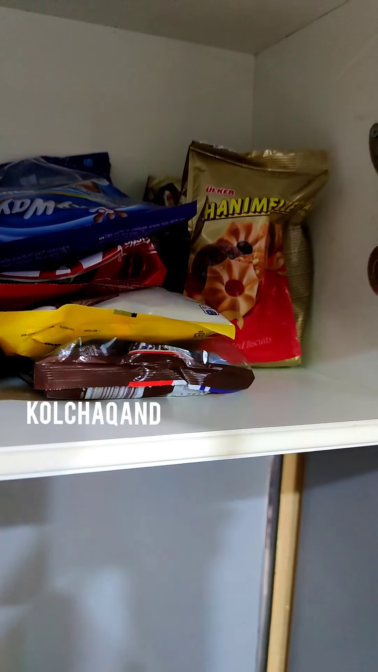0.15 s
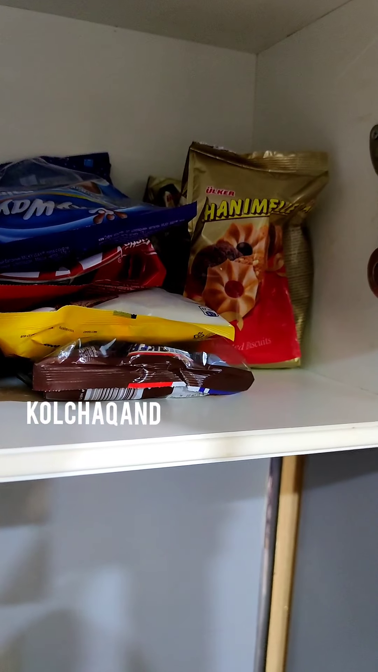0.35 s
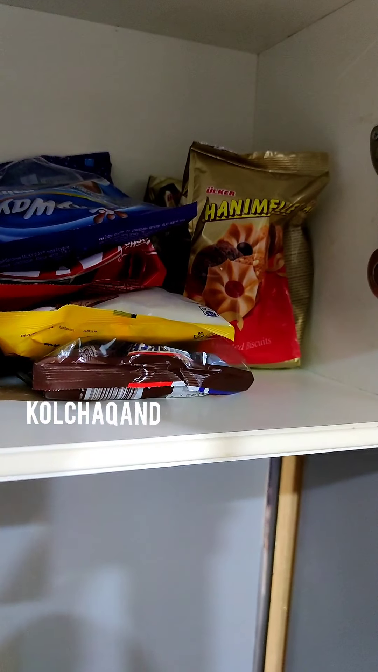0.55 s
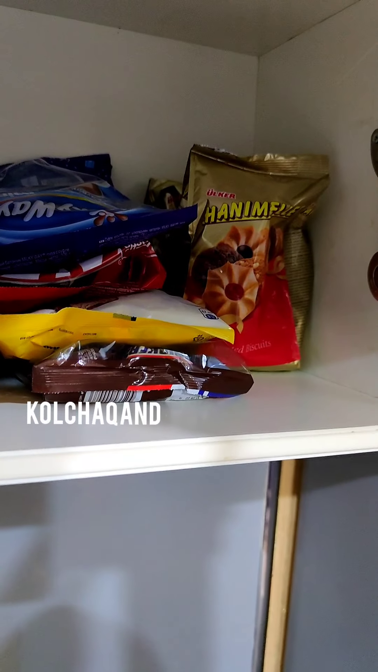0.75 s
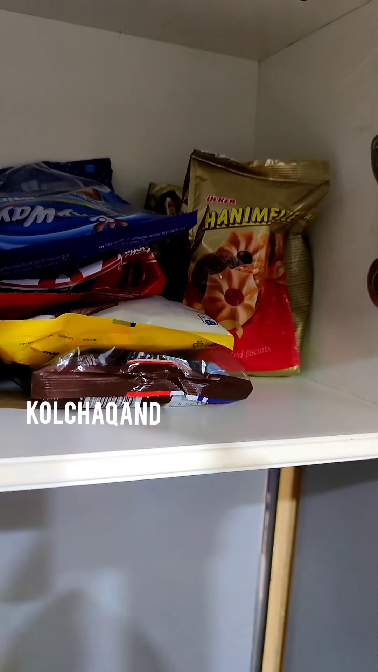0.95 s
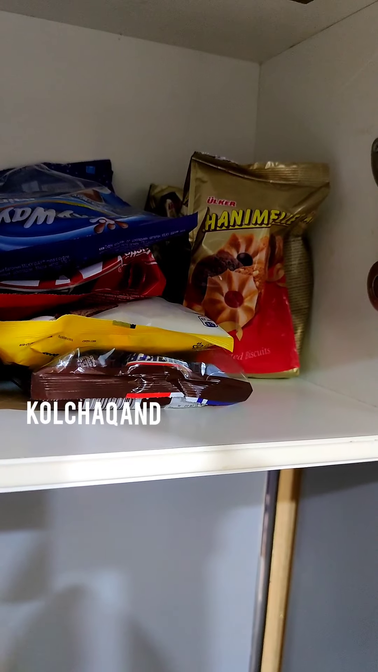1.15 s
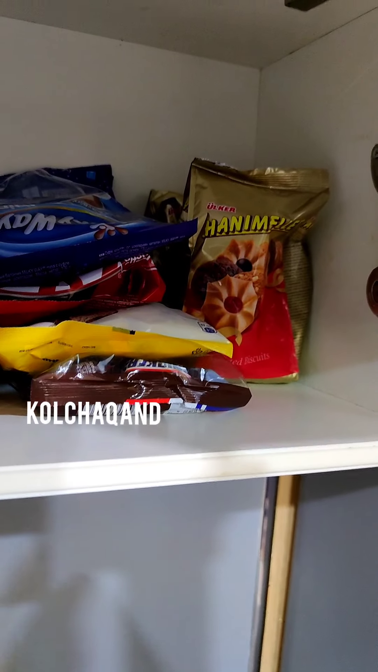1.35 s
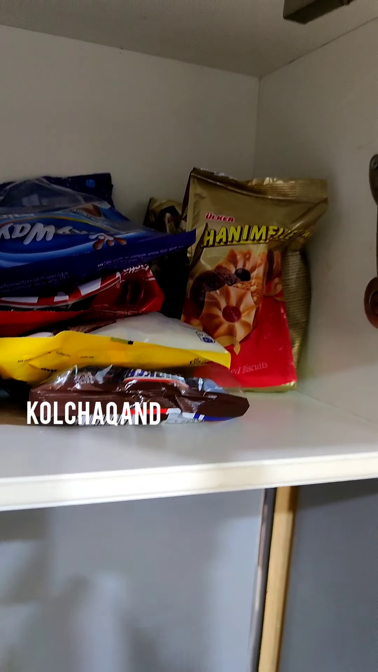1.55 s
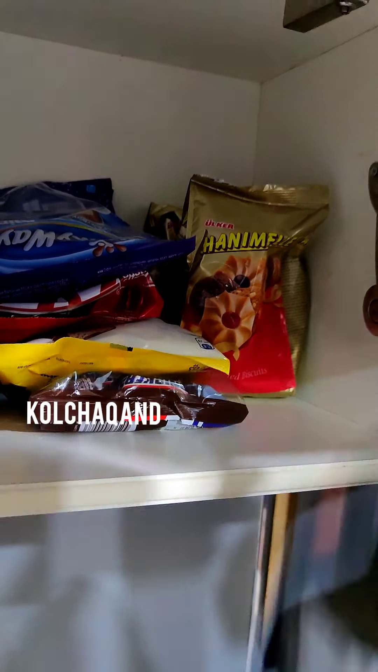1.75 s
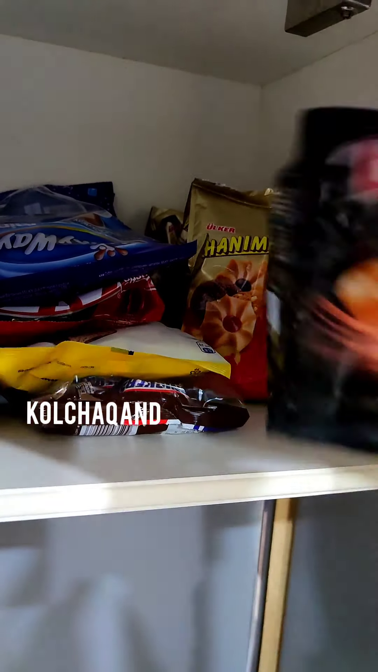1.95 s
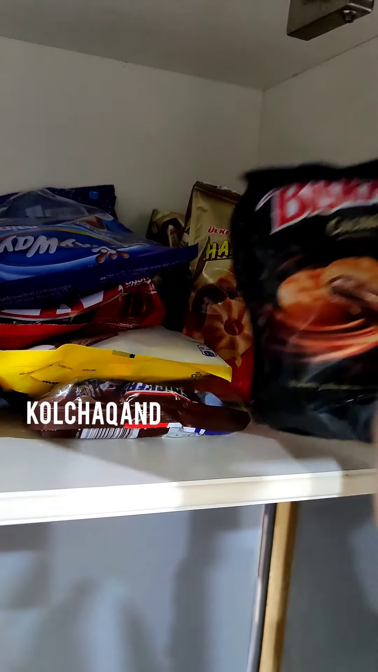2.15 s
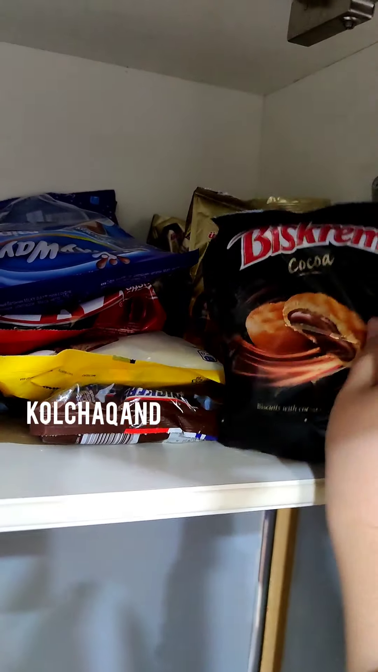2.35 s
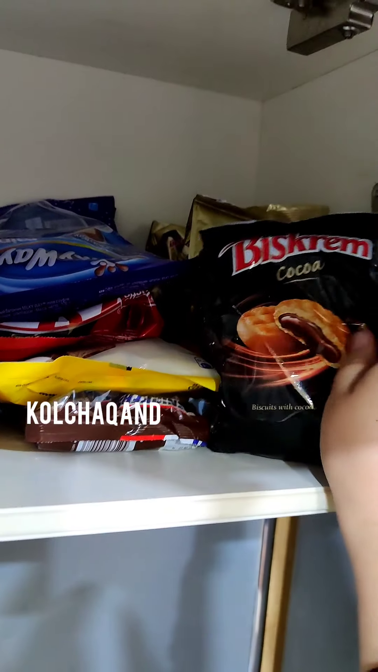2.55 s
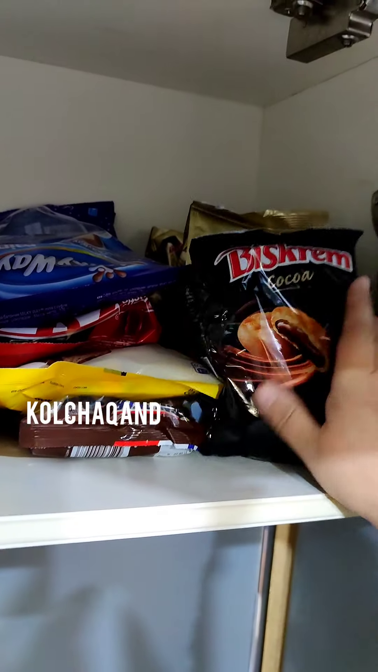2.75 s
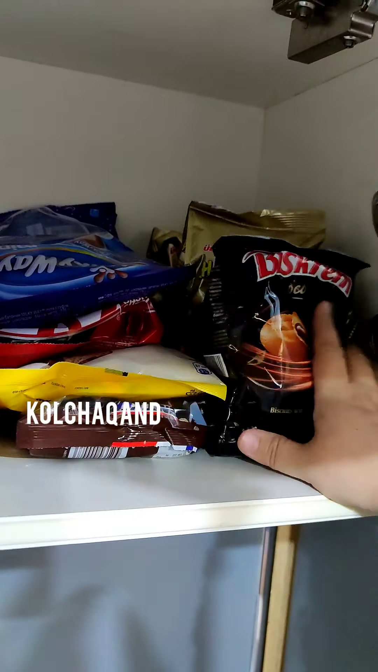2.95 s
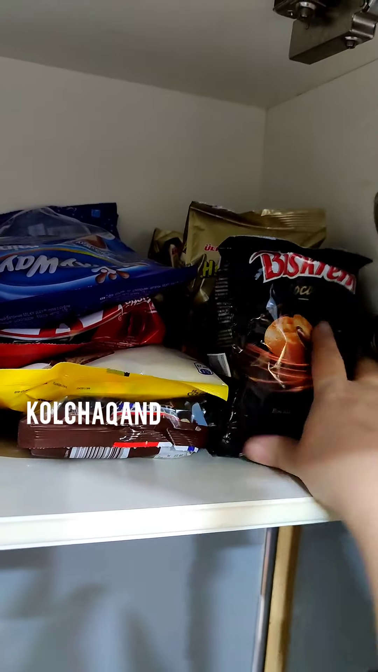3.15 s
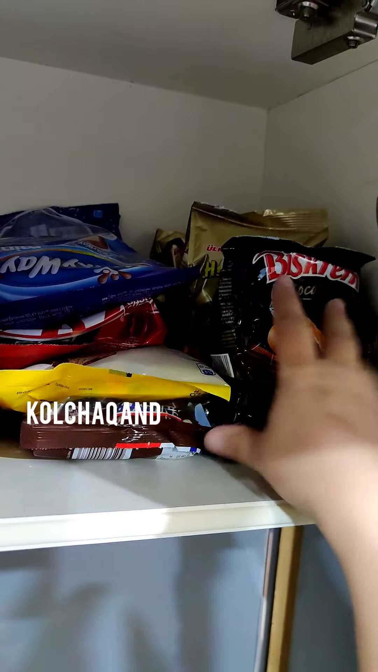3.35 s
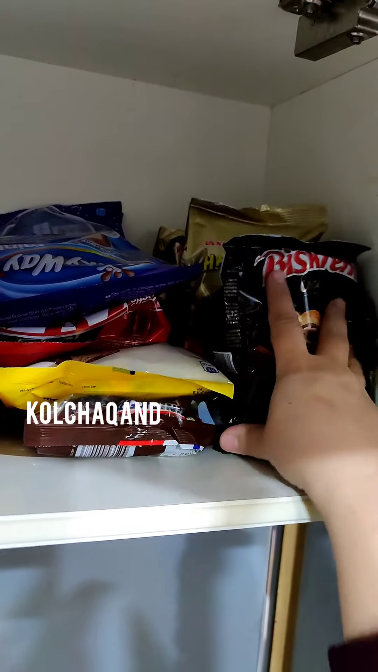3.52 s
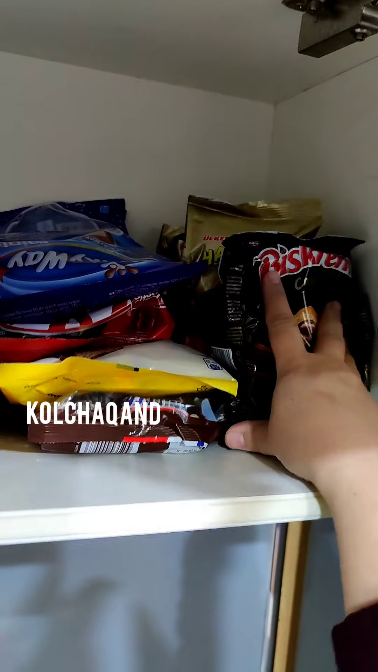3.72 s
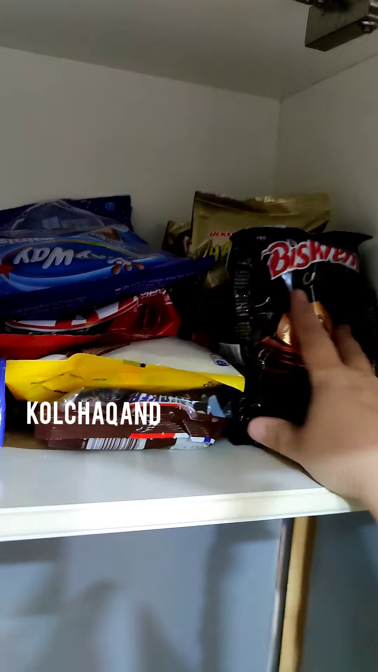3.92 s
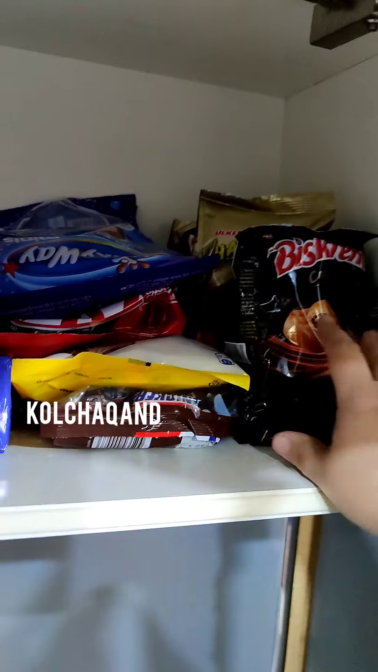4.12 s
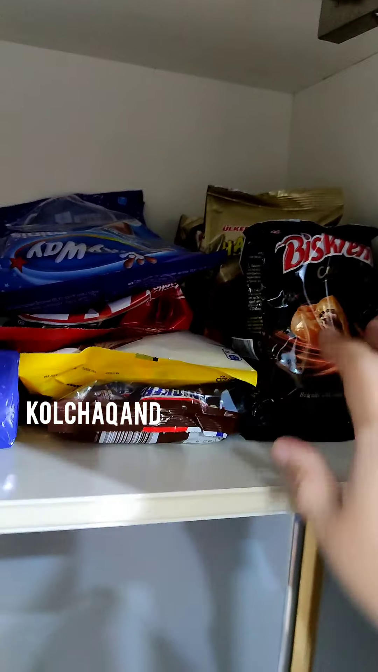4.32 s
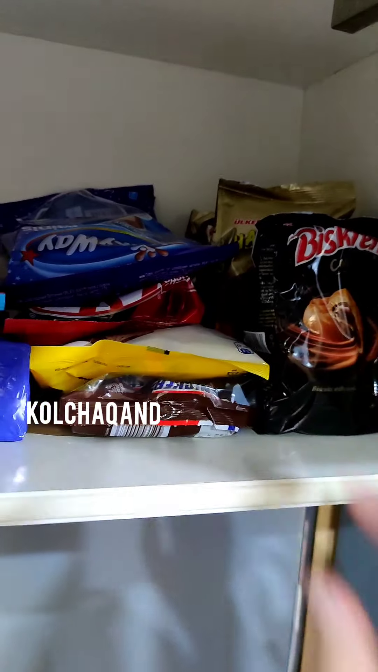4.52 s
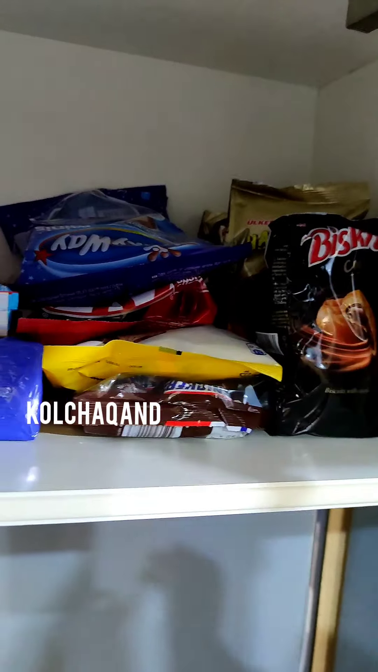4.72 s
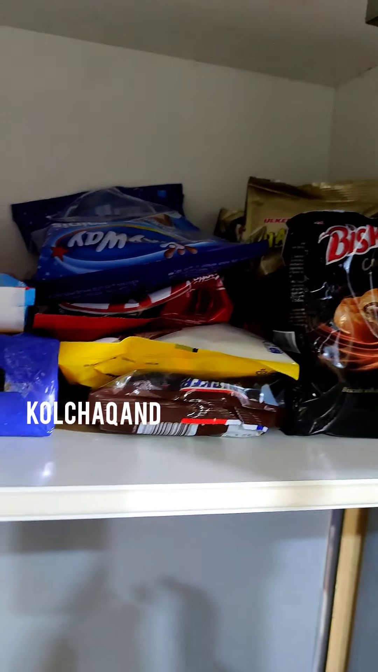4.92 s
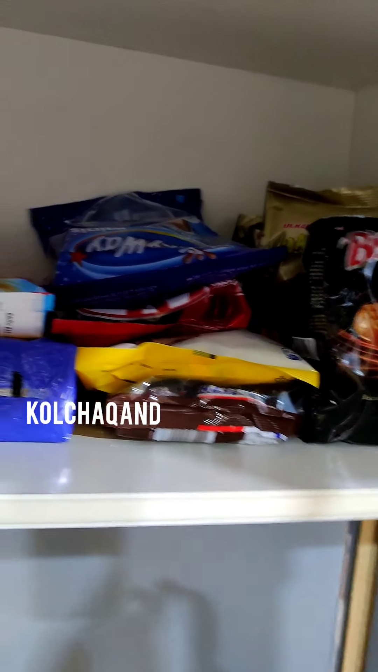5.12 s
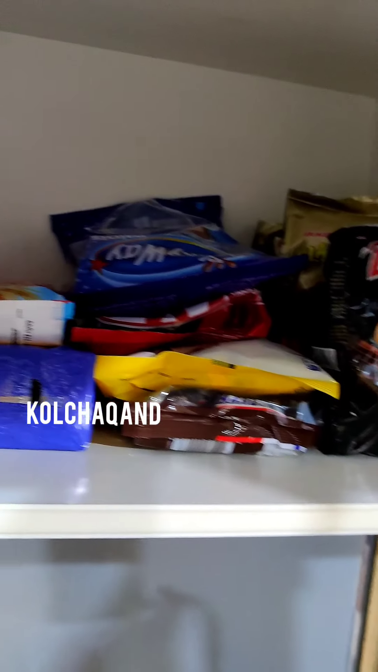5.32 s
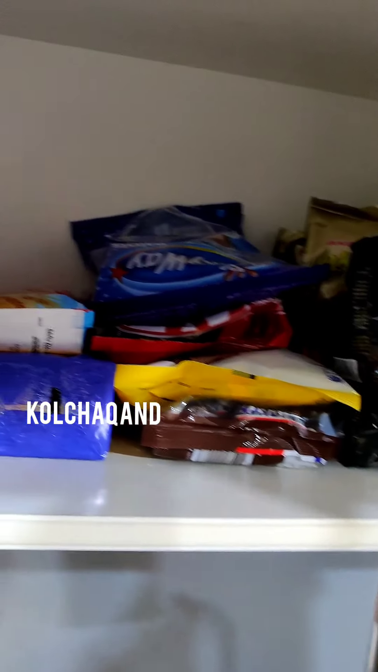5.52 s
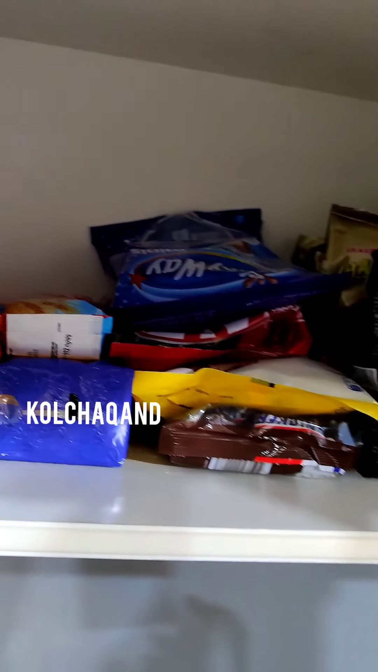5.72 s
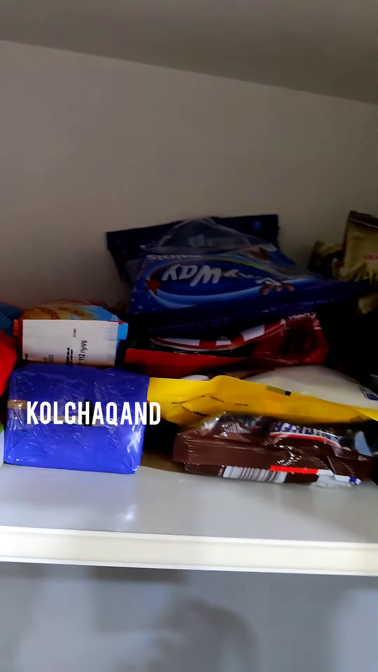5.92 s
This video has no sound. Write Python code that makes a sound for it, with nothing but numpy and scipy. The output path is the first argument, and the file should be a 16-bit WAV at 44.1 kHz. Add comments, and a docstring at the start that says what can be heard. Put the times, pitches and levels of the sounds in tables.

```python
"""Snack bag onto a shelf

A hand lifts a foil-lined plastic snack bag, stands it on a cupboard shelf and presses it into place.
The film buckles in sharp snaps over a dense rustle of creasing and sliding; the air-filled bag and the
cupboard boom below. A few light taps ring the shelf, in a quiet room heard by two spaced microphones."""
import sys
import numpy as np
from scipy import signal
from scipy.fft import rfft, irfft
from scipy.io import wavfile

SR = 44100
rng = np.random.default_rng(int(sys.argv[2]) if len(sys.argv) > 2 else 0)


def dump_mix(stems):
    """Bounce the given channels to the path in sys.argv[1] as a 16-bit WAV at rate SR."""
    frames = np.atleast_2d(stems).T  # one column per channel
    limited = np.clip(frames, -1, 1)  # hard clip at full scale
    pcm = np.round(limited * 32767).astype(np.int16)
    wavfile.write(sys.argv[1], SR, pcm)


N = 263494
LEFT_LATE_S = 0.000285   # on the shelf, the bag is nearer the right microphone


def amp(db):
    """Decibels to gain."""
    return 10 ** (np.asarray(db) / 20)


def unit_rms(x):
    """Scale to rms 1."""
    return x / np.sqrt(np.mean(x ** 2) + 1e-20)


def at_hz(curve, hz):
    """Read a curve on a log-frequency axis."""
    freqs, values = np.transpose(curve)
    return np.interp(np.log(hz), np.log(freqs), values)


def ring(clicks, hz, t60):
    """A unit click rings a sine of height 1, which dies by 60 dB in t60 seconds."""
    r, w = amp(-60 / (t60 * SR)), 2 * np.pi * hz / SR
    return signal.lfilter([0, np.sin(w)], [1, -2 * r * np.cos(w), r * r], clicks + 1e-18)


def stereo_noise(gain, correlation, balance_db, left_late_s):
    """Noise with its own gain, stereo width and pan at every frequency; rms 1."""
    hz = np.maximum(np.fft.rfftfreq(N, 1 / SR), 1)
    mid, side = rfft(rng.standard_normal((2, N)))
    alike = np.clip(at_hz(correlation, hz), -1, 1)
    pair = np.sqrt(1 + alike) * mid + np.sqrt(1 - alike) * side * [[1], [-1]]
    pair[0] *= np.exp(-2j * np.pi * hz * left_late_s)
    return unit_rms(irfft(pair * gain(hz) * amp(balance_db(hz) / 2 * [[1], [-1]]), N))


# Tone of the room: f/Hz, relative level/dB
ROOM_EQ = [(12, -26), (20, 6), (43, 4), (186, -14.5), (258, -7.5), (322, -17), (412, -9), (966, -21),
           (1080, -29), (1720, -20.5), (3620, -29.5), (7810, -27.5), (8960, -40), (14300, -27.5)]
# Its stereo image: f/Hz, L-R correlation
ROOM_IMAGE = [(60, 0.1), (180, 0.64), (550, 0.34), (1650, 0.048), (4970, 0.06), (15000, -0.12)]
def room_tone(level_db=-60.5):
    """A steady, wide bed of low rumble and faint hiss."""
    return amp(level_db) * stereo_noise(lambda hz: amp(at_hz(ROOM_EQ, hz)), ROOM_IMAGE, np.zeros_like, 0)


# Tone of the film: f/Hz, relative level/dB
FILM_EQ = [(41, -59), (70, -30), (102, -18), (182, -0.5), (243, -8), (311, 0.5), (355, -12.5), (380, -6.5),
           (580, -8.5), (693, -13.5), (1800, -8), (2360, -17.5), (7840, -18), (14300, -26.5)]
# Resonances of bag and cupboard: f/Hz, width/Hz, boost/dB
RESONANCES = [(172, 8.9, 4), (309.2, 5.1, 4.5), (381, 87, 3), (694, 46, 8.5), (1520, 240, 1.5),
              (7670, 1500, 7.5), (471, 20, 2)]
# Stereo image of the bag: f/Hz, L-R correlation
BAG_IMAGE = [(60, .6), (125, 0.84), (300, 1), (600, 0.72), (1200, 0.28), (2500, 0.053), (8000, 0.067)]
# Its pan across the spectrum: f/Hz, L-R/dB
BAG_BALANCE = [(60, -3), (120, -5), (240, -2), (480, -1), (950, -18), (1890, -6.5), (3770, 1.5),
               (7520, -1.5), (15000, -3)]
def film_noise(low_hz, high_hz):
    """One band of the film's colour, lifted at the resonances of bag and cupboard."""
    def gain(hz):
        peaks_db = sum(db / (1 + (2 * (hz - f) / width) ** 2) for f, width, db in RESONANCES)
        edges = 1 / np.sqrt((1 + (low_hz / hz) ** 8) * (1 + (hz / high_hz) ** 8))
        return amp(at_hz(FILM_EQ, hz) + peaks_db) * edges
    return stereo_noise(gain, BAG_IMAGE, lambda hz: at_hz(BAG_BALANCE, hz), LEFT_LATE_S)


# Grips, pushes and slides: t/s, hold/s, level/dB, boom offset/dB, body offset/dB
HAND_MOVES = [(0, 0.032, -59.5, -2.5, 3), (0.613, 0.0088, -64, -0.5, 1), (0.76, 0.041, -55.5, -5.5, -3.5),
              (0.853, 0.0053, -60, -5, -16), (0.954, 0.12, -47.5, -7.5, -28), (1.103, 0.03, -39, -2, -5),
              (1.158, 0.062, -33, -32, -9.5), (1.253, 0.076, -44, -1.5, -2), (1.334, 0.04, -33, -5, 2),
              (1.394, 0.067, -38, -1, -3.5), (1.512, 0.3, -53, -7, 1.5), (2.403, 0.015, -42, 2, 2.5),
              (2.478, 0.08, -44, 4, 7.5), (2.622, 0.075, -38.5, -22, 5), (2.725, 0.086, -39, -0.5, 3),
              (2.854, 0.13, -41.5, -0.5, 5), (3.0, .12, -42.5, -4.5, 3), (3.189, 0.072, -38, -3.5, 3.5),
              (3.46, .04, -49.5, 8.5, 12.5), (3.506, 0.16, -36, -0.5, 1), (3.638, 0.05, -37, -16, 4),
              (3.699, 0.034, -48.5, 14, 13.5), (3.796, 0.13, -51, 0, 7.5), (3.922, 0.13, -52.5, 3, -3)]
# Faint rustle of the loosely held or settling bag: t/s, level/dB
SETTLING = [(0, -62), (.3, -65), (.63, -69), (.66, -111), (.9, -66.5), (1.8, -62), (2.05, -60),
            (2.15, -69.5), (2.38, -69), (3.3, -52), (3.44, -79.5), (4.1, -67.5), (4.3, -69.5), (5.0, -69.5),
            (5.97, -83)]
def hand_envelopes(rise_db_per_s=1197, fall_db_per_s=292):
    """Rustle gains for crack, boom and body: each move rises fast, holds and falls to a faint bed."""
    t = np.arange(N // 32 + 2) * 32 / SR
    start, hold, db, boom_db, body_db = np.array(HAND_MOVES).T[:, :, None]
    before, after = np.maximum(start - t, 0), np.maximum(t - start - hold, 0)
    moves_db = db - rise_db_per_s * before - fall_db_per_s * after
    bed_db = np.interp(t, *np.transpose(SETTLING))
    gains = []
    for move_offset, bed_offset in [(0, 0), (boom_db, -6.5), (body_db, 0.5)]:
        power = (amp(moves_db + move_offset) ** 2).sum(axis=0) + amp(bed_db + bed_offset) ** 2
        gains.append(np.interp(np.arange(N) / SR, t, np.sqrt(power)))
    return gains


def buckle_envelope(power, attack_s, t60, echo_db, echo_t60):
    """Amplitude of a short crack plus its echo in the cupboard, for a train of power impulses."""
    def decay(seconds):
        return signal.lfilter([1], [1, -amp(-120 / (seconds * SR))], power + 1e-18)
    r = np.exp(-1 / (attack_s * SR))
    with_echo = decay(t60) + amp(2 * echo_db) * decay(echo_t60)
    return np.sqrt(signal.lfilter([1 - r], [1, -r], with_echo))


# Boom, body, crack and sizzle bands: low/Hz, high/Hz, attack/s, t60/s, echo level/dB, echo t60/s
BANDS = [(98.7, 720, 0.00062, 0.033, -8.5, 0.21), (604, 3300, 0.00021, 0.012, -21, .16),
         (2200, 5680, 0.00016, 0.014, -17, 0.13), (5820, 16000, .0001, 0.006, -18.5, 0.074)]
# Blend from grainy creasing (0) to smooth sliding (1): t/s, share
SLIDE_BLEND = [(0, 0.68), (1.06, 0.91), (1.12, 0.6), (1.6, 0.22), (1.8, 0.72), (2.36, 0.64), (2.42, 0.49),
               (4.05, 0.04), (4.15, 0.5), (5.97, 0.78)]
# Pan and brightness of the travelling bag: t/s, L-R/dB, sizzle offset/dB
BAG_PATH = [(0, 4, -1), (.9, 3, 4), (1.5, 2.5, -5), (2.0, 1, -4.5), (2.6, 0, -4), (3.6, 0, -8),
            (4.2, 0.5, 1), (5.97, 4, -5.5)]
def rustle(noises, creases_per_s=240, spread_db=6.5):
    """Small creases buckle at random over smooth sliding; all four bands follow the same creases."""
    t = np.arange(N) / SR
    path_s, _, sizzle_db = np.transpose(BAG_PATH)
    crack, boom, body = hand_envelopes()
    sizzle = crack * amp(np.interp(t, path_s, sizzle_db))
    smooth = np.clip(np.interp(t, *np.transpose(SLIDE_BLEND)), 0, 1)
    powers = amp(2 * spread_db * np.minimum(rng.exponential(1, N), 3))
    creases = powers * (rng.random(N) < creases_per_s / SR)
    out = 0
    for gain, noise, band in zip([boom, body, crack, sizzle], noises, BANDS):
        colour = amp(rng.normal(0, 7.7, N))   # each crease favours different bands
        grain = unit_rms(buckle_envelope(creases * colour, *band[2:]))
        out = out + gain * noise * np.sqrt(smooth + (1 - smooth) * grain ** 2)
    return out + crack * np.sqrt(1 - smooth) * crackle(grain)   # clumps follow the sizzle's grain


def crackle(clumps, clicks_per_s=900.0, ring_cycles=11):
    """Tiny creases click at a rate scaled by clumps, each ringing at one of twenty pitches."""
    born = rng.random(N) < clicks_per_s / SR * clumps
    sizes = born * amp(2.9 * np.minimum(rng.exponential(1, N), 4)) * rng.choice([-1, 1], N)
    clicks = sizes * amp(rng.normal(0, 1.3, (2, N)))   # unequal at the two microphones
    lag = round(LEFT_LATE_S * SR)
    clicks[0] = np.roll(clicks[0], lag)
    note = rng.integers(0, 20, N)
    note = np.stack([np.roll(note, lag), note])
    out = 0
    for k, hz in enumerate(np.geomspace(900, 12500, 20)):
        gain = amp(at_hz(FILM_EQ, hz) / 2) * np.sqrt(hz)
        out = out + gain * ring(clicks * (note == k), hz, ring_cycles / hz)
    return unit_rms(out)


def film_panel(burst, hz, lift_db, ring_cycles=8.0):
    """A buckled panel of film rings briefly, lifting the burst around its own pitch."""
    r, w = amp(-60 * hz / (ring_cycles * SR)), 2 * np.pi * hz / SR
    resonance = signal.lfilter((1 - r * r) / 2 * np.array([1, 0, -1]), [1, -2 * r * np.cos(w), r * r], burst)
    return burst + amp(lift_db) * resonance


# Sharp buckles: t/s, crack level/dB, boom, body and sizzle offsets/dB, body f/Hz, crack f/Hz
SNAP_CUES = [(0.5885, -48, -11, -6, -8, 643, 7400), (1.1001, -22, -10, -2, -8, 2050, 2240),
             (1.1108, -14.5, -17, -7, -4, 2150, 6260), (1.1389, -26, -17, 7, 2, 2020, 6710),
             (1.1647, -9, -10, -5, -6.5, 2200, 5700), (1.2126, -22, -17.5, -18, -8, 1820, 7300),
             (1.2295, -20, -15.5, -32, 0, 2180, 2780), (1.3042, -25.5, -27, -12, -6, 1630, 7240),
             (1.3284, -25, -9, -6, -4, 1620, 6840), (1.3544, -10.5, -22, -14, 1.5, 1730, 7200),
             (1.3973, -21.5, -6.5, 2.5, 1, 1020, 2680), (1.4071, -20, -22, -1, -10, 2200, 7000),
             (1.4354, -12, -21, -21, -6.5, 1520, 7300), (1.4577, -22.5, -29, -0.5, 4, 1570, 5430),
             (1.489, -24.5, -10, -4, 0.5, 1520, 4030), (1.5243, -17.5, -15, -14.5, -3.5, 1510, 5400),
             (1.5566, -18, -26.5, -9, -11, 2020, 8000), (1.6397, -28.5, -9, 0, -0.5, 1280, 7550),
             (1.705, -29, -28, -14, -1, 1580, 7400), (1.716, -22, -14, 1, 1.5, 596, 2530),
             (1.7607, -17, -24, -2, -13, 740, 4340), (1.8768, -50.5, 3, 15, -14, 705, 2880),
             (1.9558, -24, -25, 1, -1, 885, 5150), (1.9932, -28, -43, 4.5, -16, 1400, 8100),
             (2.0218, -35.5, -24, -10, -3, 969, 7190), (2.0717, -29, -25, -5.5, -4, 1000, 7470),
             (2.1291, -44.5, -7.5, 7.5, 0, 907, 4000), (2.2217, -32, -19, -20, -17, 880, 3860),
             (2.3123, -21, -18.5, -0.5, 6, 1080, 8100), (2.391, -25.5, -21, -2.5, -2, 1080, 5900),
             (2.4094, -29, -25.5, 3, 1, 945, 3100), (2.4722, -17.5, -18.5, -6, -8, 714, 4360),
             (2.4841, -26.5, -9.5, 1, -11.5, 880, 4920), (2.531, -24.5, -16, 2, -1, 1390, 3070),
             (2.543, -23.5, -2.5, -3.5, -3, 740, 4000), (2.598, -15.5, -7.5, -0.5, -6.5, 1400, 3780),
             (2.6328, -27, -20, -8, -9, 1670, 5100), (2.6406, -24, -10, -8, -14, 700, 2880),
             (2.6595, -23, -3.5, 2.5, 5.5, 680, 7660), (2.6717, -27, -5, 7, 1, 1660, 2950),
             (2.6899, -21.5, -7, -10, 2.5, 711, 7330), (2.71, -23, -22, -19, 0, 1530, 5560),
             (2.7492, -18, -17, -19, 3.5, 1490, 5700), (2.7755, -25.5, -5, -1, -12, 1590, 3320),
             (2.795, -23, -19, 0.5, 0.5, 1420, 4910), (2.8109, -12.5, -29, -4.5, -3.5, 1760, 5700),
             (2.8542, -15.5, -29, -2, -9, 2100, 3650), (2.8744, -23.5, -17, 1.5, 3.5, 888, 4300),
             (2.8938, -34, -9, 11, -9, 619, 3680), (2.9128, -25, -28, -14, 3, 1680, 2360),
             (2.9384, -15.5, -26, -12, -17, 1440, 5820), (2.9511, -16, -17, -4, -3, 690, 2680),
             (2.9722, -18, -12.5, -3.5, -0.5, 820, 2900), (3.007, -18.5, -35, -0.5, 5, 1550, 8600),
             (3.037, -24, -18, -18, -17, 2020, 3920), (3.0578, -30, -18, -1, -17, 724, 4160),
             (3.0845, -17.5, -21, -0.5, -17, 730, 3900), (3.0939, -18.5, -37, -7, 0.5, 1760, 2380),
             (3.1154, -22.5, -9, 1, -4.5, 1960, 2320), (3.1666, -28, 2.5, 4, -4, 690, 4020),
             (3.1782, -30.5, -13.5, 1, -10, 1440, 3530), (3.1954, -13, -29, -6, -4, 1760, 2830),
             (3.2117, -20.5, -18, -11, -5, 1660, 3030), (3.253, -34, -21, -5, -13, 1110, 3400),
             (3.3086, -24, -7, 2.5, -5, 1090, 4700), (3.4602, -28, 1, 4, -15, 1270, 4020),
             (3.4785, -36, -11, -22, -4, 1640, 3080), (3.496, -25.5, -17.5, -3.5, -6, 1090, 4960),
             (3.5092, -21, -18, -5, -9, 1430, 4730), (3.5314, -10, -8.5, -5, -6, 1610, 4800),
             (3.5547, -23, -20, -8, -7, 896, 3760), (3.5757, -16.5, -9, -10, -6, 1940, 3020),
             (3.5909, -15.5, -8, -3.5, 1, 716, 2570), (3.619, -15, -18, -14, -4, 684, 4500),
             (3.6371, -19, -4.5, -0.5, 6.5, 730, 5270), (3.6509, -18, 1, 1.5, -11, 1250, 7700),
             (3.6638, -20, -9, 5.5, 3, 1070, 7850), (3.6896, -13, -23, -0.5, -5, 690, 4200),
             (3.7296, -15.5, -6.5, -2, -6.5, 1780, 3200), (3.763, -36, 3, 8.5, -10, 1330, 3520),
             (3.784, -39, -6, 5.5, -8, 1270, 2620), (3.8178, -31, -6, 3, -1.5, 700, 7730),
             (3.8538, -34.5, -15, 7, -15, 1090, 2600), (3.914, -35, -1.5, 1, -12, 1850, 2650),
             (3.9341, -24, -13, 0, -1, 1630, 2950), (3.9438, -20.5, -35, -12, 3, 1410, 4120),
             (3.9704, -25.5, -6.5, -4.5, -12, 980, 2950), (3.9937, -11, -24.5, -6.5, -4, 1760, 8400),
             (4.0428, -43, -17, 6.5, -5, 1210, 3570), (4.0672, -41, -13, -3, 2, 1980, 3850),
             (4.144, -38.5, -13, 4, 8.5, 910, 7600), (4.1725, -37, -14.5, -7, -3, 1990, 7640),
             (4.2503, -54, -10, -7, 10, 633, 7630), (4.4038, -38, 1, 10.5, -13, 730, 4800),
             (4.4571, -31, -12, -2, -15, 1300, 4560), (4.6848, -39, -7, 3.5, -1, 970, 4140),
             (4.774, -56, -8, -10, 13, 935, 6770), (4.8734, -51, -14, -16, -8, 616, 2500),
             (5.096, -47.5, -10, 0, 0, 967, 6060), (5.1956, -50, -16, -12, -5, 2080, 2750),
             (5.5656, -37, -29, -10, -17, 1330, 3860), (5.9394, -51, -16, -11, -12, 1760, 2780)]
# Pitched colour of body, crack and sizzle: panel lift/dB, clean ring/dB
SNAP_TONES = [(11.5, -10.5), (10, -17), (6, -40)]
def snaps(noises, cascade_ms=4.4, sizzle_hz=12400, pop_cycles=6.0):
    """The film snaps in a cascade: a faint first give, the main buckle, four weaker followers."""
    size, lead = SR // 4, SR // 500
    out = np.zeros((2, N + size))
    noise_starts = rng.integers(0, N - size, (len(SNAP_CUES), 4))
    followers = rng.random((len(SNAP_CUES), 2, 4))
    buckle = np.zeros((2, size))
    buckle[[0, 1], [lead + round(LEFT_LATE_S * SR), lead]] = 1
    for cue, starts, (when, weakness) in zip(SNAP_CUES, noise_starts, followers):
        t, crack_db, boom_db, body_db, sizzle_db, body_hz, crack_hz = cue
        cascade = np.zeros(size)
        cascade[lead + (when * cascade_ms / 1000 * SR).astype(int)] = amp(2 * (-4.5 - 7.7 * weakness))
        cascade[[0, lead]] = amp(2 * -17.0), 1   # first give, main buckle
        at = round(t * SR) - lead
        offsets, pitches = [boom_db, body_db, 0, sizzle_db], [0, body_hz, crack_hz, sizzle_hz]
        for db, hz, tone, noise, band, i in zip(offsets, pitches, [None, *SNAP_TONES], noises, BANDS, starts):
            burst = noise[:, i:i + size] * buckle_envelope(cascade, *band[2:])
            if hz:
                lift_db, ring_db = tone
                burst = film_panel(burst, hz, lift_db)
                burst = burst / np.abs(burst).max() + amp(ring_db) * ring(buckle, hz, pop_cycles / hz)
            peak = np.abs(burst).max(axis=1).mean()
            out[:, at:at + size] += amp(crack_db + db) * burst / peak
    return out[:, :N]


def into_cupboard(bag, enters_s=1.983, crossfade_s=0.16):
    """The bag travels in from the left; outside, it is hollower and reaches the left microphone first."""
    def around(hz):
        return signal.sosfilt(signal.butter(1, [hz / 1.1, hz * 1.3], "band", fs=SR, output="sos"), bag)
    t = np.arange(N) / SR
    right_late_s = 0.00037
    left, right = bag - 0.77 * around(205) + 0.32 * around(392)   # less deep note, more hollow note
    outside = np.stack([np.roll(left, -round(LEFT_LATE_S * SR)), np.roll(right, round(right_late_s * SR))])
    inside = np.clip((t - enters_s) / crossfade_s, 0, 1)
    path_s, balance_db, _ = np.transpose(BAG_PATH)
    pan = amp(np.interp(t, path_s, balance_db) / 2 * np.array([[1], [-1]]))
    return pan * (np.sqrt(1 - inside) * outside + np.sqrt(inside) * bag)


# Dull taps on the shelf: t/s, blow level/dB, L-R/dB, contact/ms
TAP_CUES = [(4.4032, -29.5, -10.5, 0.34), (4.685, -52, -14, 0.62), (5.268, -35, -6, 2.57)]
# Modes of the shelf board: f/Hz, level/dB, t60/s
SHELF_MODES = [(310, -3, 0.035), (630, 7, 0.02), (900, 9, 0.0062), (1110, 2, 0.029), (1330, -13, 0.028)]
def shelf_taps():
    """A fingertip blow rings the modes of the board; longer contact sounds duller."""
    blows = np.zeros((2, N))
    for t, db, pan_db, contact_ms in TAP_CUES:
        progress = np.arange(200) / (contact_ms / 1000 * SR)
        push = np.sin(np.pi * np.minimum(progress, 1)) ** 2
        at = round(t * SR)
        blows[:, at:at + 200] = amp(db + np.array([[pan_db], [-pan_db]]) / 2) * push / push.sum()
    return sum(amp(db) * (-1) ** k * ring(blows, hz, t60) for k, (hz, db, t60) in enumerate(SHELF_MODES))


def scene():
    """Room, bag and taps; a small bag and a thin board radiate no deep bass."""
    noises = [film_noise(low, high) for low, high, *_ in BANDS]
    room = room_tone()
    bag = signal.sosfilt(signal.butter(3, 135, "high", fs=SR, output="sos"), snaps(noises) + rustle(noises))
    shelf = signal.sosfilt(signal.butter(2, 180, "high", fs=SR, output="sos"), shelf_taps())
    return room + into_cupboard(bag) + shelf


def record(dry):
    """The treble falls away fast above 14 kHz and the very top is cut steeply."""
    dulled = signal.sosfilt(signal.cheby1(7, .5, 14300, fs=SR, output="sos"), dry)
    return signal.sosfilt(signal.cheby2(18, 70, 16700, fs=SR, output="sos"), dulled)


dry = scene()
out = record(dry)
dump_mix(out)
```